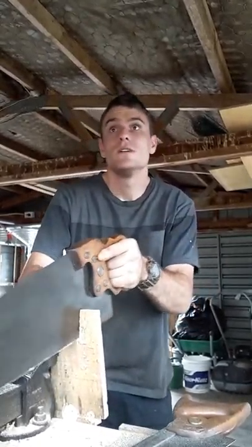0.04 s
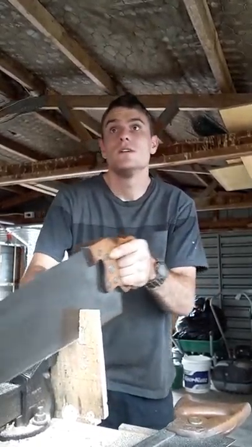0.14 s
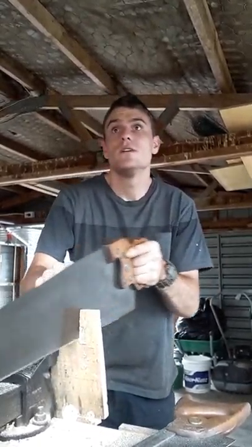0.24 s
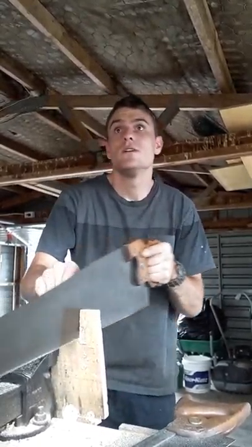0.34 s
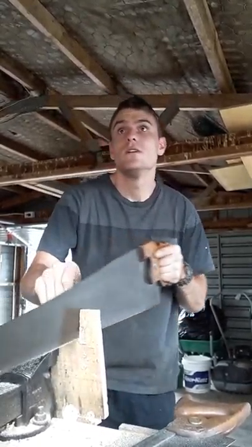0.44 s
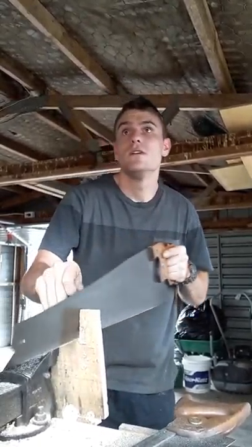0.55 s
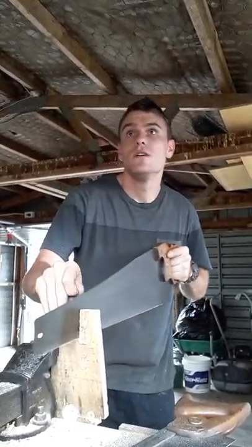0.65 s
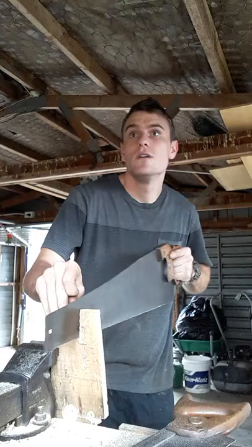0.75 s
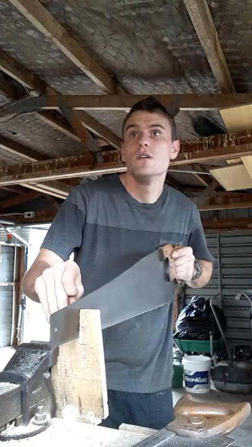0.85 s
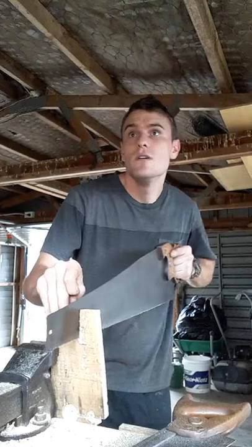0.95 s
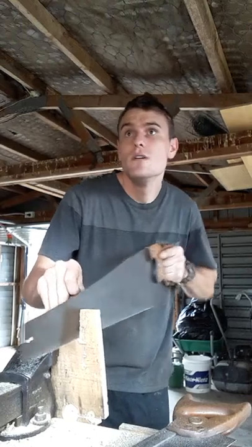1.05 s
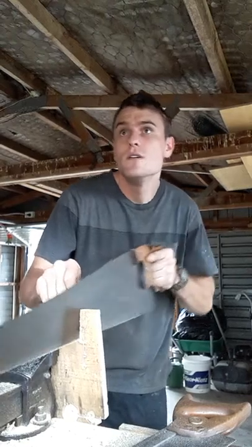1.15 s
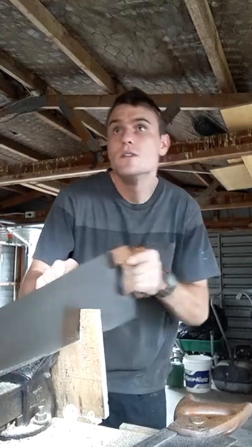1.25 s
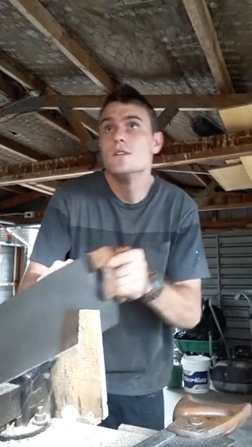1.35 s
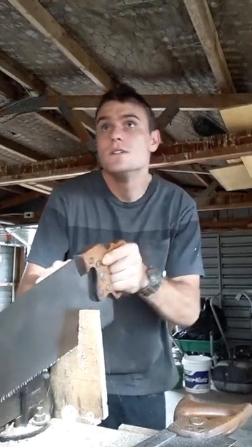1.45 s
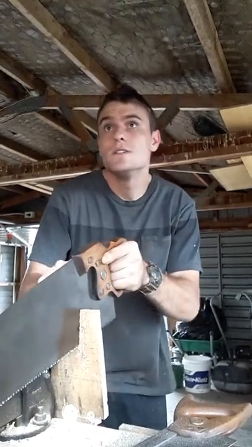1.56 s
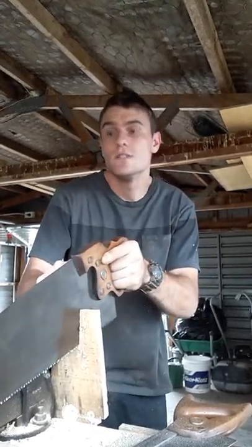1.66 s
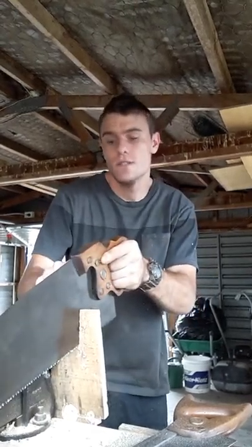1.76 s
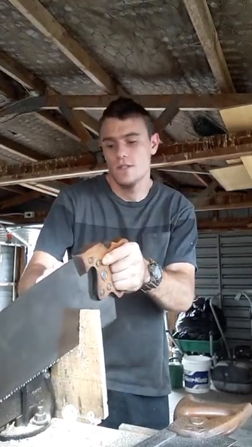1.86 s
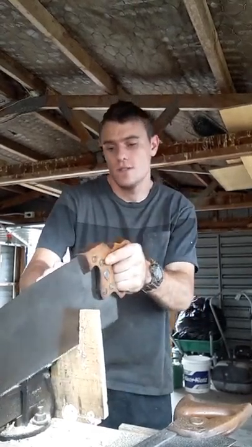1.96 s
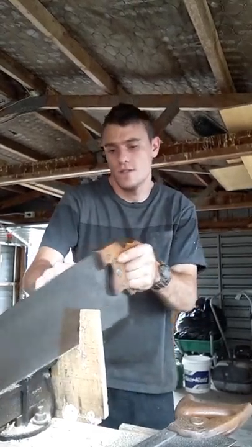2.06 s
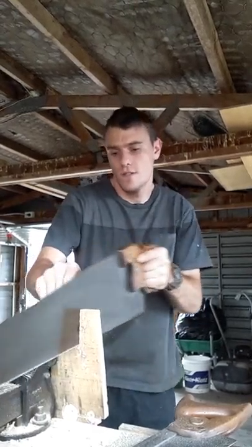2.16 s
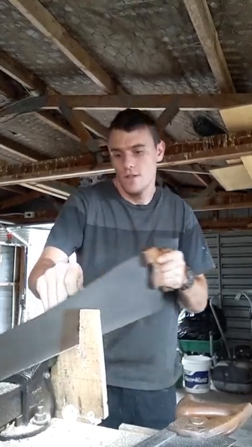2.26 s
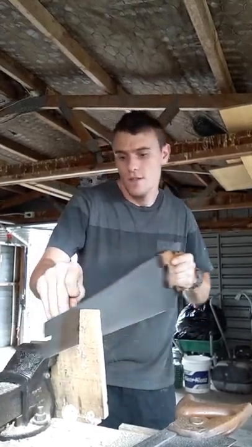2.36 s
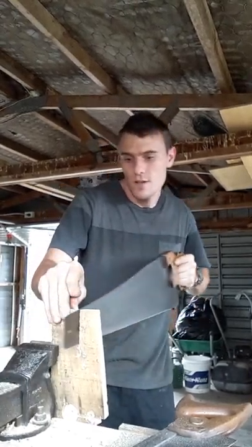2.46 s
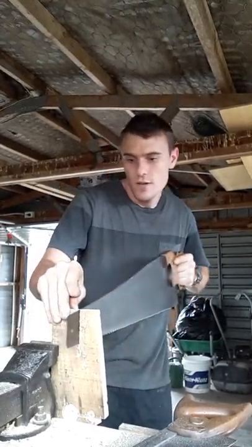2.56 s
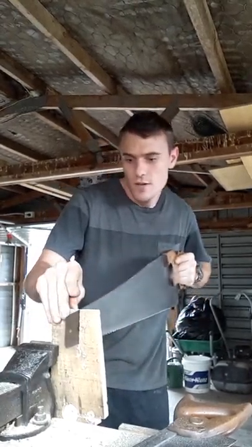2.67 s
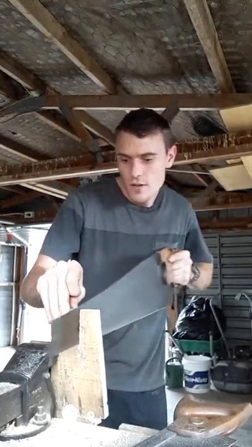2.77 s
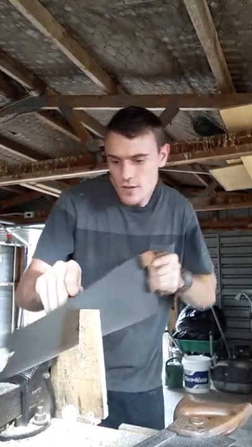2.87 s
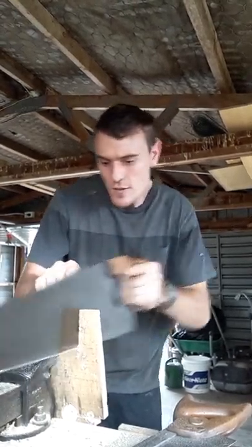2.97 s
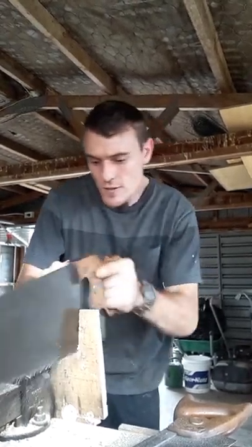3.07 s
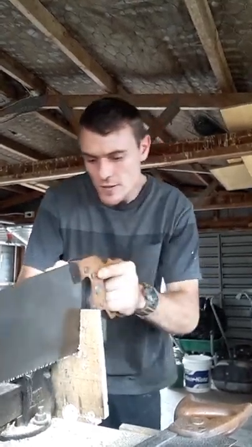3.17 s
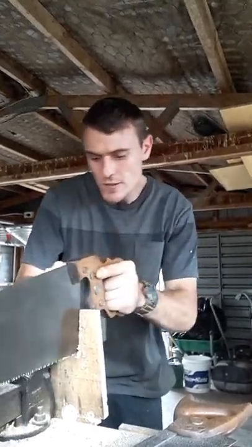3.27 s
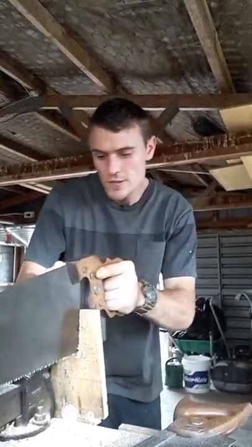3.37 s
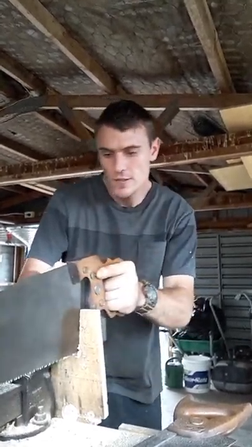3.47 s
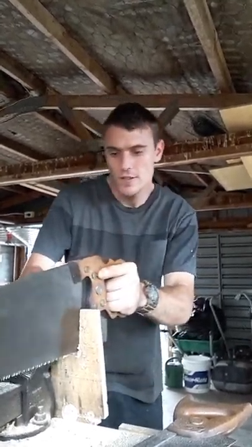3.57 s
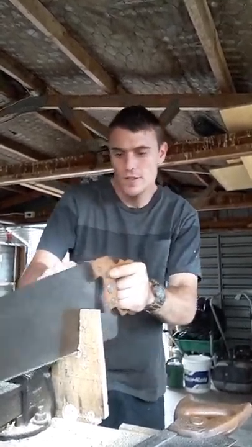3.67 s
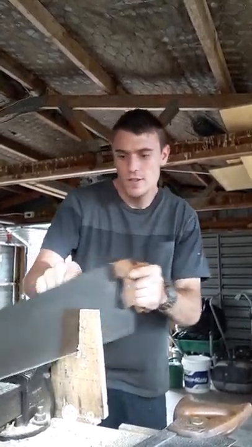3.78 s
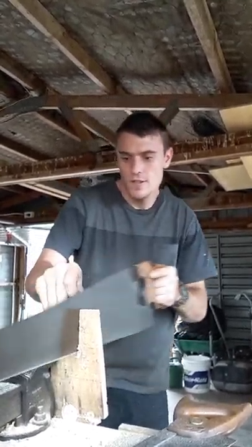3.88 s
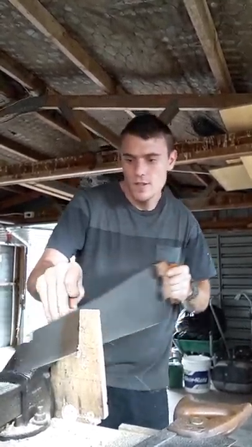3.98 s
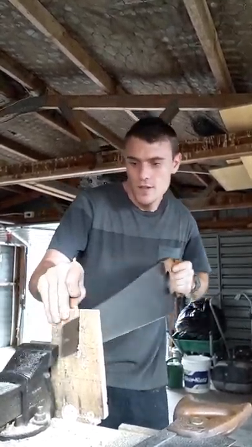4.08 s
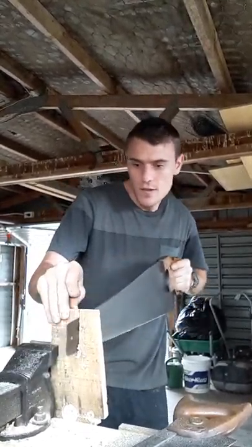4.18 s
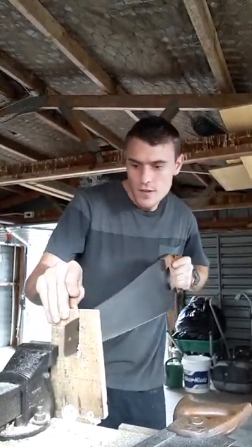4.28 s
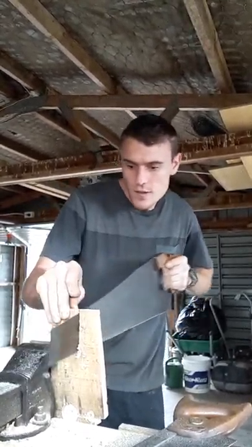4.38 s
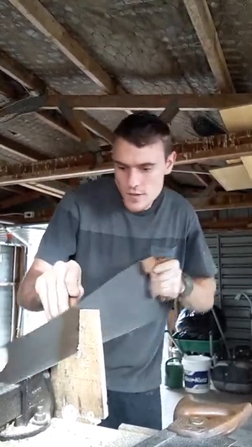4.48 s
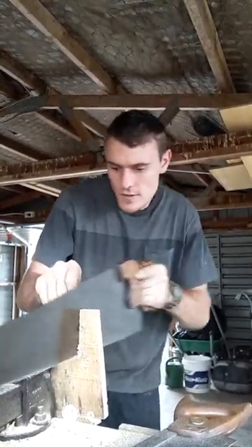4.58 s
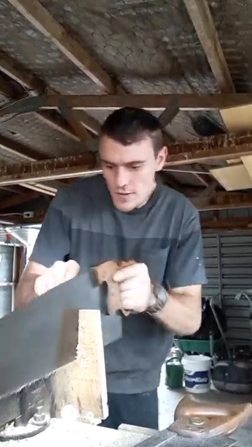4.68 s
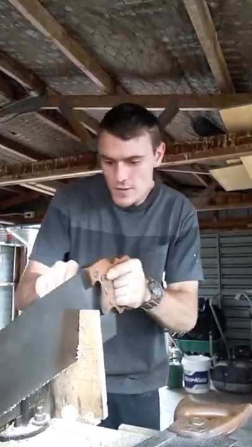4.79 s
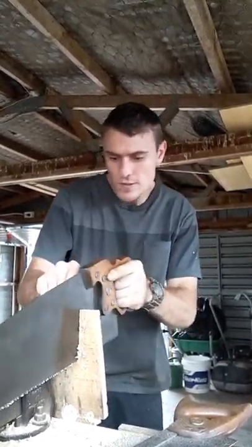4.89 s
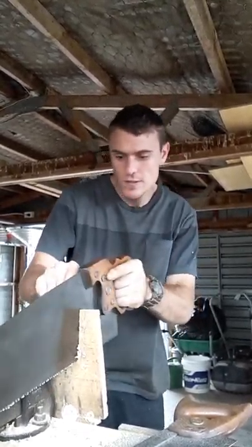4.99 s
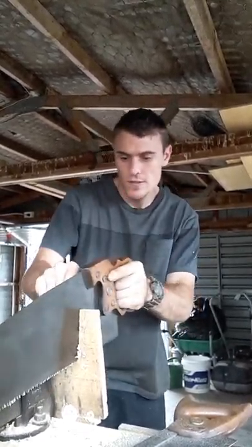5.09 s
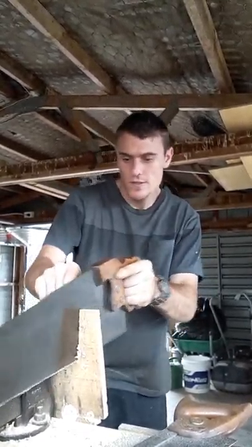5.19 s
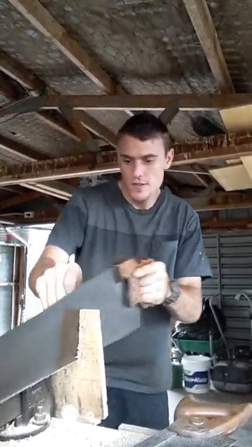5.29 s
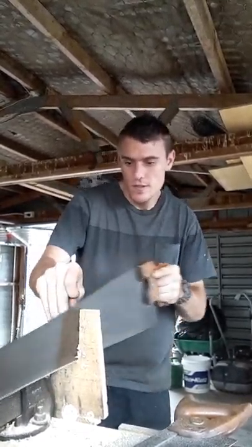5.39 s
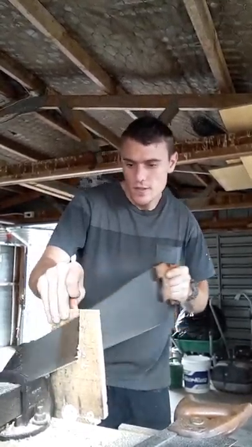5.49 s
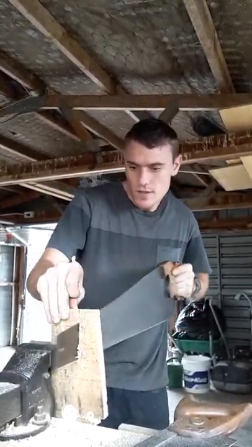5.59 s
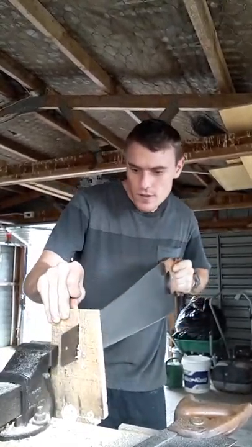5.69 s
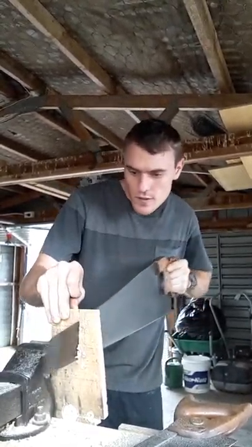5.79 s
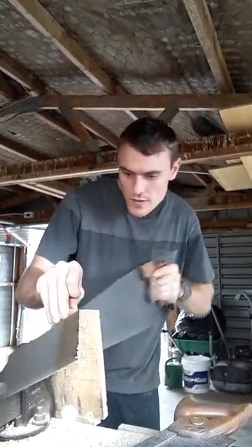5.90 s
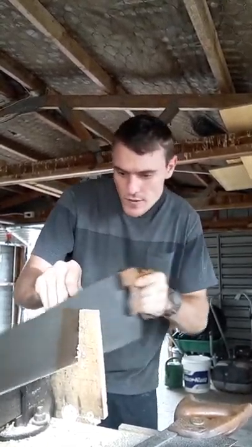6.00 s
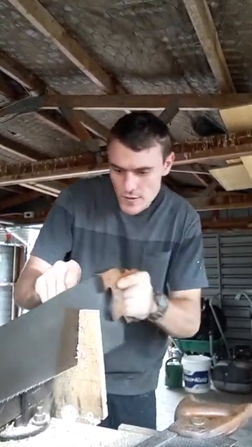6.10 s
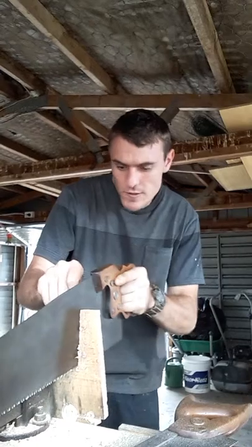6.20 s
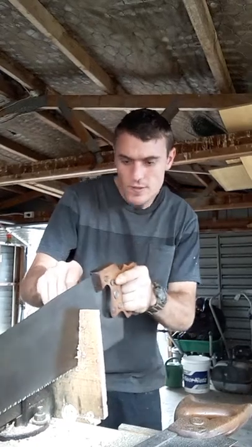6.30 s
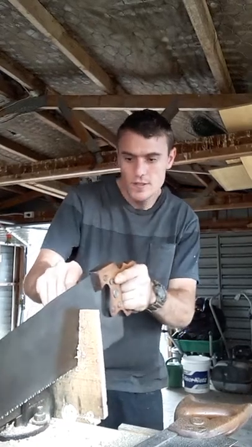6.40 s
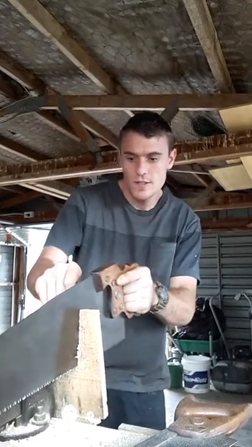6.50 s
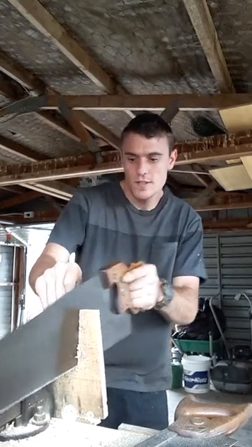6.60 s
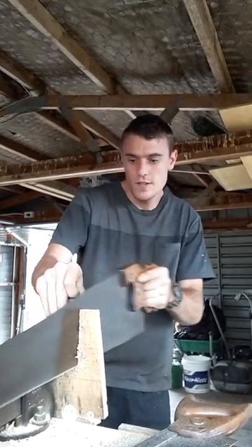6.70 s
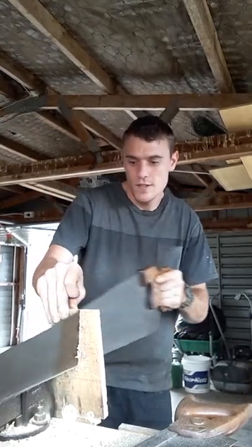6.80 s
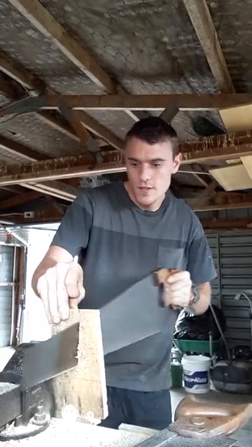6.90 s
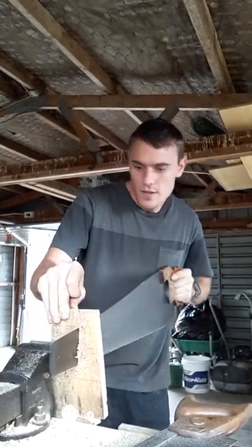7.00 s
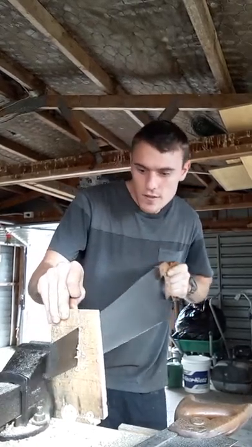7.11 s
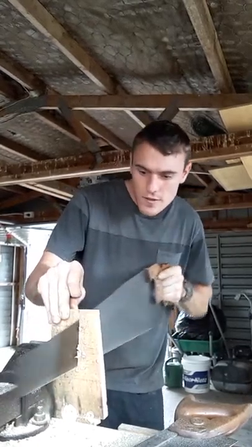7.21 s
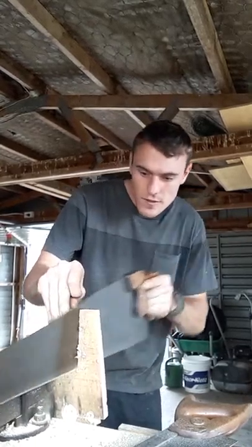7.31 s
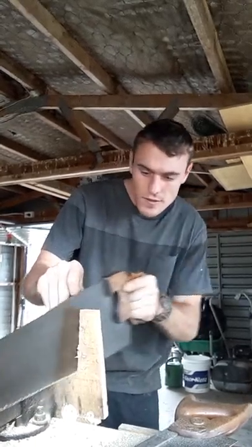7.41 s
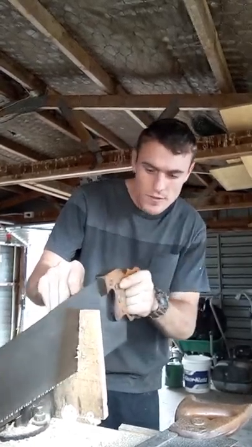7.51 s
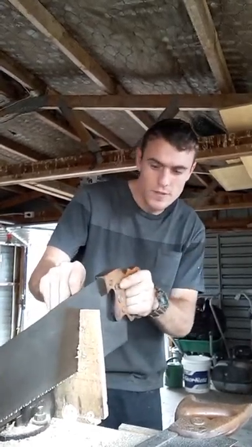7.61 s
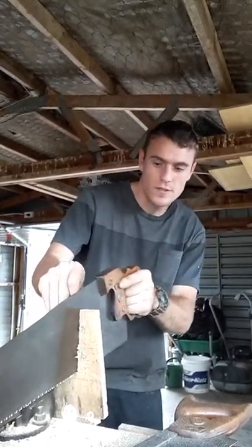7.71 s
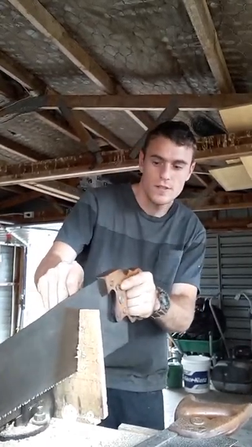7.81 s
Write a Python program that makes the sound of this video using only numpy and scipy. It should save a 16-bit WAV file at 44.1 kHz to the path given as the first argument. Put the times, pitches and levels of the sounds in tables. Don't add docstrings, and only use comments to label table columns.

```python
import sys
import numpy as np
from scipy import signal
from scipy.fft import rfft, irfft, next_fast_len
from scipy.io import wavfile
from scipy.ndimage import uniform_filter1d

SR = 44100
rng = np.random.default_rng(int(sys.argv[2]) if len(sys.argv) > 2 else 0)


def persist_wave(psi):
    counts = np.round(np.clip(psi, -1, 1) * 32767).astype(np.int16)
    wavfile.write(sys.argv[1], SR, np.atleast_2d(counts).T)


def decibels_to_gain(level_db):
    exponent = np.asarray(level_db, float) / 20
    return 10 ** exponent


N = 346185

# bench level in dB,
# feed in dB of the wood modes near 410, 780, 1000 and 1710 Hz.
BEARING = [(-19.5, -7, -4, 4, -21.5), (-18, -4.5, -0.5, 4.5, -21), (-18.5, 0.5, 0.5, 5, 1),
           (-22, -0.5, -0.5, 6, 2), (-20, -3.5, -1.5, 0, 2.5), (-21.5, 0.5, 0.5, -1.5, 2.5),
           (-24, 2, 1, -3, 6.5), (-23, -4.5, 1, -2, 2), (-24.5, 3.5, -1, -5, 4), (-23.5, -3.5, 0, 1.5, 3)]


def saw():
    which, _ = stroke_now()
    bench_peak_db, *grip_db = np.transpose(BEARING)
    grip_db = uniform_filter1d(np.array(grip_db)[:, which], size=2000)
    blade_db = blade_level()
    speed = np.clip(decibels_to_gain(0.44 * (blade_db + 21)), 0.08, 1.3)
    force = contact(speed, bite_db=-9, spread_db=2.0, tears_per_s=7000)
    steel = decibels_to_gain(blade_db - 0.28) * blade_rasp(speed, grip_db[2])
    return bench_rumble(force, bench_peak_db) + hums(force) + wood_rasp(force, speed, grip_db) + steel


# start, fastest and stop in seconds, blade and wood rasp in dB.
STROKES = [
    (0.03, 0.331, 0.9, -25, -20),
    (0.947, 1.171, 1.5, -19.5, -16),
    (1.96, 2.328, 2.57, -22, -18),
    (2.715, 2.943, 3.2, -16, -16.5),
    (3.62, 3.949, 4.22, -20, -18),
    (4.312, 4.521, 4.84, -16, -17.5),
    (5.141, 5.449, 5.71, -21, -22),
    (5.77, 5.95, 6.22, -16, -18),
    (6.57, 6.882, 7.09, -24, -23.5),
    (7.1, 7.319, 7.53, -17.5, -19),
]


def stroke_now():
    t = np.arange(N) / SR
    start, _, stop, *_ = np.transpose(STROKES)
    which = np.maximum(np.searchsorted(start, t) - 1, 0)
    return which, np.clip((t - start[which]) / (stop - start)[which], 0, 1)


def answer(peak_db, pull_law, push_law, lag_s=0):
    t = np.arange(N) / SR
    which, _ = stroke_now()
    start, fastest, stop, *_ = np.array(STROKES)[which].T
    speeding = (t - start - lag_s) / (fastest - start - lag_s)
    slowing = (stop - t) / (stop - fastest)
    arc = np.where(t < fastest, speeding, slowing)
    speed_db = 20 * np.log10(np.sin(np.pi / 2 * np.clip(arc, 0, 1)) + 1e-4)
    power = 0
    for pushing, (rising, falling, fast, linger_db, slow) in enumerate([pull_law, push_law]):
        driven_db = np.asarray(peak_db)[which] + np.where(t < fastest, rising, falling) * speed_db
        driven_db = np.where(which % 2 == pushing, driven_db, -200)
        quick_db, late_db = (np.maximum.accumulate(driven_db + rate * t) - rate * t for rate in (fast, slow))
        power = power + decibels_to_gain(quick_db) ** 2 + decibels_to_gain(late_db + linger_db) ** 2
    return 10 * np.log10(power)


def peaks(rows, rise_db_s, fall_db_s):
    t = np.arange(N) / SR
    swells = []
    for s, held, db in rows:
        swells.append(db - rise_db_s * np.maximum(s - t, 0) - fall_db_s * np.maximum(t - s - held, 0))
    return np.max(swells, axis=0)


def contact(speed, bite_db, spread_db, tears_per_s):
    teeth_per_s = 190
    turn = np.cumsum(teeth_per_s * speed * (1 + 0.3 * drift(60))) / SR
    passes = np.diff(np.floor(turn), prepend=0) > 0
    bites = passes * decibels_to_gain(2.8 * rng.standard_normal(N)) * np.sqrt(speed * SR / teeth_per_s)
    load = np.minimum(speed, 1)
    sizes = decibels_to_gain(spread_db * load * np.minimum(rng.exponential(1, N), 5)) * rng.standard_normal(N)
    tears = (rng.random(N) < tears_per_s / SR / load) * sizes * np.exp(-0.7 * load * (turn % 1))
    force = (rms_one(tears) + decibels_to_gain(bite_db) * bites) * decibels_to_gain(1.84 * drift(30))
    return force / np.sqrt(uniform_filter1d(force ** 2, size=4400) + 1e-9)


# start and hold in seconds, rasp in dB.
CREEPS = [(0, 0.021, -66), (.88, .07, -50), (1.53, .1, -51), (1.7, .25, -65), (2.62, 0.077, -56),
          (3.3, 0.29, -56), (4.24, 0.064, -51), (4.9, .24, -56), (5.72, 0.029, -47), (6.4, .16, -63.5),
          (7.72, 0.091, -65)]
# power of rising and of falling speed, fast release in dB/s, lingering share in dB,
# slow release in dB/s.
BLADE_LAW = (1.22, 1.1, 300, -30, 45)


def blade_level():
    stroke_db = answer(np.transpose(STROKES)[3], BLADE_LAW, BLADE_LAW)
    return np.maximum(stroke_db, peaks(CREEPS, rise_db_s=200, fall_db_s=150))


# frequency in Hz, width in Hz, level in dB.
BLADE = [(3780, 68, -6), (4059, 73, 15), (4790, 41, -0.5), (5620, 490, 5), (7080, 37, -15), (8650, 660, 1)]
# frequency in Hz, density in dB per Hz.
BLADE_BODY = [(1650, -26), (2800, -10.5), (3530, -16.5), (3820, -11.5), (3930, -10), (4160, -8.5),
              (4600, -15.5), (6140, -18.5), (7090, -13), (8360, -0.5), (11100, -19.5), (12300, -21),
              (14000, -24), (15600, -25.5)]


def blade_rasp(speed, grip_db):
    rasp = plate(contact(speed, bite_db=-24, spread_db=1.6, tears_per_s=14000), t60_s=0.05)
    steel = modes(rasp, BLADE, np.outer([0.4, 0.63, 0.4, 0.48, 0.4, 0.24], grip_db))
    blade = rms_one(decibels_to_gain(-8.0) * rms_one(steel) + coloured(rasp, BLADE_BODY))
    edge = np.clip(5.8 * speed - 0.4, 0, 1) ** 0.63
    return dulled(blade, 10200, edge ** 2)


def plate(x, t60_s):
    t = np.arange(3000) / SR
    shimmer = rng.standard_normal(3000) * 1000 ** (-t / t60_s)
    return x + decibels_to_gain(-10.5) * signal.fftconvolve(x, shimmer / np.sqrt(np.sum(shimmer ** 2)))[:N]


# frequency in Hz, width in Hz, level in dB.
WOOD = [(338, 45, -2.5), (550.2, 8.5, 5.5), (1160, 37, -21), (1346, 73, -17), (2147, 88, -2.5),
        (2380, 18, -12), (2820, 48, -17)]
WOOD_GRIPPED = [(398.8, 8.5, 5), (812.3, 20.4, 0.5), (977, 153, -13.5), (1731.5, 38, -4.5)]
# frequency in Hz, density in dB per Hz.
WOOD_BODY = [(180, -19.5), (300, 1.5), (329, -6), (545, -15.5), (616, -11.5), (2160, -15), (3500, -26),
             (4550, -73.5), (7700, -120)]
WOOD_LAW = (1.1, 0.83, 221, -20.5, 48.5)
PUSH_WOOD_LAW = (0.89, 0.45, 152, -15.5, 58)


def wood_rasp(force, speed, grip_db):
    level_db = answer(np.transpose(STROKES)[4], WOOD_LAW, PUSH_WOOD_LAW)
    rings = modes(force, WOOD, [0] * 7) + modes(force, WOOD_GRIPPED, 1.35 * grip_db)
    wood = rms_one(rms_one(below(rings, 4280)) + decibels_to_gain(1.0) * coloured(force, WOOD_BODY))
    wood = dulled(wood, 920, np.clip(1.15 * speed, 0.6, 1))
    return decibels_to_gain(level_db + 2.5) * wood


# time in seconds, pitch in Hz, level in dB.
GROANS = [
    [(0.28, 446, -26.5), (0.312, 419, -39), (0.336, 399, -23), (0.406, 415, -16.5), (0.516, 416, -23),
     (0.588, 407, -18), (0.66, 380, -31)],
    [(6.7, 417, -33), (6.78, 407, -19), (6.838, 415, -10.5), (6.914, 415, -14), (6.946, 409, -33),
     (7.008, 406, -32), (7.04, 420, -22)],
]


def hums(force):
    groans = []
    for rows in GROANS:
        before = (rows[0][0] - 0.04, rows[0][1], -90)
        after = (rows[-1][0] + 0.04, rows[-1][1], -90)
        groans += [before, *rows, after]
    main = decibels_to_gain(-2.0) * board_hum(force, hum_course(), width_hz=13.8)
    return main + decibels_to_gain(-5.0) * board_hum(force, in_time(groans), width_hz=16)


def board_hum(force, course, width_hz):
    hz, level_db = course
    hz = uniform_filter1d(hz, size=5000)
    spin = np.exp(2j * np.pi * np.cumsum(hz) / SR)
    r = np.exp(-np.pi * width_hz / SR)
    swing = signal.lfilter([1], [1, -2 * r, r * r], force / spin)
    even = swing / np.abs(swing) ** 0.68
    return decibels_to_gain(level_db) * rms_one(np.real(even * spin))


# start and hold in seconds, level in dB.
LOCKS = [(.13, 0.012, -22), (.27, 0.024, -7.5), (.46, 0.015, -17), (.62, 0.061, -27), (.87, 0.027, -21.5),
         (1.24, 0.04, -5.5), (1.35, 0.053, -12), (2.13, 0.015, -9.5), (2.24, 0.029, -9), (2.46, .04, -13.5),
         (2.775, 0.048, -8), (3.05, .02, -22), (3.15, .03, -16.5), (3.75, 0.067, -14.5), (3.92, 0.093, -9),
         (4.09, 0.034, -10), (4.39, .04, -8), (4.51, 0.061, -13), (4.635, .04, -8.5), (4.72, 0.024, -11),
         (5.29, .02, -15.5), (5.38, 0.1203, -14), (5.65, 0.025, -19), (5.8, .15, -9.5), (6.03, .03, -8.5),
         (6.14, 0.01, -10.5), (6.66, 0.029, -14.5), (6.77, 0.063, -13.5), (6.96, 0.09, -11.5),
         (7.17, .21, -9)]
HUM_LAW = (0.6, .45, 408, -23, 53)


def hum_course():
    kerf_sag_hz = 1.373 * np.arange(N) / SR
    stroke_sag_hz = 12.2 * stroke_now()[1]
    hz = 276.5 - kerf_sag_hz - stroke_sag_hz + 3.06 * drift(2.7)
    free_db = answer([-19] * len(STROKES), HUM_LAW, HUM_LAW, lag_s=0.022)
    return hz, np.maximum(free_db, peaks(LOCKS, rise_db_s=401.5, fall_db_s=352.5))


# frequency in Hz, width in Hz, level in dB.
BENCH = [(122.7, 30, -1.5), (165.3, 17, 5.5), (168.3, 46, -2), (215, 7.6, -31)]
BENCH_DEEP = [(60.2, 15.2, 0.014), (73.2, 17.5, 0.025)]
# time in seconds, level in dB.
JOLTS = [
    (1.1, -10),
    (1.43, -17.5),
    (3.13, -12),
    (4.681, -9.5),
    (6.129, -15.5),
    (7.45, -17.5),
]
BENCH_LAW = (0.3, 0.67, 165, -4, 56)
PUSH_BENCH_LAW = (0.15, 0.3, 160, -11.5, 56)


def bench_rumble(force, peak_db):
    jolt_db = peaks([(s, 0, db) for s, db in JOLTS], rise_db_s=117, fall_db_s=103)
    level_db = np.maximum(answer(peak_db, BENCH_LAW, PUSH_BENCH_LAW, lag_s=0.03), jolt_db)
    which, _ = stroke_now()
    deep_db = np.where(which % 2, -5, 4.5)
    shake = modes(force, BENCH, [-0.6 * deep_db] * 4) + modes(force, BENCH_DEEP, [0.27 * deep_db] * 2)
    shake = below(shake, 247)
    shake = shake / uniform_filter1d(shake ** 2, size=6000) ** 0.3
    return decibels_to_gain(level_db - 1.0) * rms_one(shake)


# time in seconds, peak in dB, crack in dB against the peak.
TICKS = [(0.124, -17.5, -12), (0.97, -44, -17), (1.609, -29.5, -18), (1.629, -25.5, -26), (1.761, -26, -32),
         (1.918, -23, -18), (1.99, -45.5, -18), (2.049, -16, -12), (2.11, -24, -2.5), (2.73, -24.5, -23),
         (3.294, -22.5, -27), (3.476, -26.5, -25), (3.57, -27.5, -34), (4.308, -40.5, -3),
         (4.886, -28.5, -18), (4.985, -31.5, -21), (5.039, -23, -22), (5.095, -26.5, -31),
         (5.146, -23, -15), (5.81, -24, -23), (6.21, -21.5, -11), (6.302, -29.5, -21.5), (6.35, -37.5, -15),
         (6.45, -23, -14), (6.634, -19, -11.5), (7.669, -28.5, -18.5), (7.754, -23.5, -18)]
# frequency in Hz, level in dB, T60 in seconds.
TICK_MODES = [(428, -4, 0.11), (571, -2.5, 0.18), (681, 0.5, 0.035), (966, 3, 0.029), (1194, 4.5, 0.021),
              (1376, -14.5, 0.1), (1583, -15, 0.06), (1920, -9.5, .03), (2280, -13, 0.018),
              (2920, -23, 0.091)]
# frequency in Hz, density in dB per Hz.
TICK_CRACK = [(600, -20.5), (1500, 0), (3000, 0.5), (5500, -3.5), (7000, -10), (8300, 0.5), (10000, -23.5),
              (15000, -45)]


def ticks():
    out = np.zeros(N + 4000)
    t = np.arange(4000) / SR
    check = 1 - 0.7 / (1 + np.exp((0.017 - t) / 0.0015))
    for s, peak_db, crack_db in TICKS:
        ring = 0
        for k, (hz, db, t60_s) in enumerate(TICK_MODES):
            level = decibels_to_gain(db + 2.2 * rng.standard_normal()) * (-1) ** k
            swell = 1 - np.exp(-t * hz / 4.2)
            ring = ring + level * np.sin(2 * np.pi * hz * t) * swell * 1000 ** (-t / t60_s)
        burst = rng.standard_normal(4000) * (np.exp(-t / 0.0008) + 0.15 * np.exp(-t / 0.008))
        crack = coloured(burst, TICK_CRACK)[:4000]
        ring = check * ring / np.abs(ring).max()
        crack = decibels_to_gain(crack_db + 16.0) * crack / np.abs(crack).max()
        at = round((s - 0.001) * SR)
        out[at:at + 4000] += decibels_to_gain(peak_db + 2.5) * (ring + crack)
    return out[:N]


# time in seconds, peak in dB.
SCUFFS = [(1.5848, -36), (3.1244, -22.5), (3.1642, -28), (3.1794, -30), (3.2206, -22), (3.2815, -31),
          (4.773, -8), (4.8097, -22), (5.7892, -13), (6.191, -15), (7.118, -20), (7.5635, -27),
          (7.5946, -31.5), (7.634, -31.5)]


def scuffs():
    t = np.arange(2000) / SR
    level = np.zeros(N + 2000)
    for s, peak_db in SCUFFS:
        at = round(s * SR)
        level[at:at + 2000] += decibels_to_gain(peak_db - 9.5) * (1 - np.exp(-t / 0.00072)) * np.exp(-t / 0.028)
    return level[:N] * dulled(coloured(rng.standard_normal(N), BLADE_BODY), 10000, 0.25)


def workshop(x):
    t60_s, wall_cut_hz = 0.65, 1600
    size = next_fast_len(N + SR)
    turn = np.exp(-2j * np.pi * np.arange(size // 2 + 1) / size)
    dull = np.exp(-2 * np.pi * wall_cut_hz / SR)
    echo = 0
    for k, lag in enumerate((rng.uniform(0.017, 0.05, 8) * SR).astype(int)):
        loop = decibels_to_gain(-60 * lag / SR / t60_s) * (1 - dull) / (1 - dull * turn) * turn ** lag
        echo = echo + (-1) ** k * loop / (1 - loop)
    return irfft(rfft(x, size) * echo, size)[:N]


# frequency in Hz, density in dB per Hz.
AIR = [(18, -42), (30, -13), (202, 24), (536, 3.5), (3510, -4.5), (4190, -20), (5380, -62), (8240, -86),
       (12000, -90), (15600, -88.5), (22000, -120)]


def room_air():
    return decibels_to_gain(-49.5) * coloured(rng.standard_normal(N), AIR)


def rms_one(x):
    return x / np.sqrt(np.mean(x ** 2) + 1e-20)


def in_time(rows):
    s, *columns = np.transpose(rows)
    return [np.interp(np.arange(N) / SR, s, c) for c in columns]


def drift(rate_hz):
    r = np.exp(-80 * np.pi * rate_hz / SR)
    slow = signal.lfilter([1], [1, -2 * r, r * r], rng.standard_normal(N // 40 + 2002))[2000:]
    return np.interp(np.arange(N) / 40, np.arange(len(slow)), rms_one(slow))


def resonate(x, hz, width_hz):
    r = np.exp(-np.pi * width_hz / SR)
    poles = [1, -2 * r * np.cos(2 * np.pi * hz / SR), r * r]
    return signal.lfilter([(1 - r * r) / 2, 0, (r * r - 1) / 2], poles, x)


def modes(x, table, feed_db):
    out = 0
    for k, (extra_db, (hz, width_hz, db)) in enumerate(zip(feed_db, table)):
        fed = x * decibels_to_gain(extra_db + 1.3 * drift(11.3))
        out = out + decibels_to_gain(db) * resonate(fed, hz, width_hz) * (-1) ** k
    return out


def coloured(x, spectrum):
    hz, level_db = np.transpose(spectrum)
    grid_hz = np.maximum(np.arange(1025) * SR / 2048, 1)
    cepstrum = irfft(np.log(decibels_to_gain(np.interp(np.log(grid_hz), np.log(hz), level_db))))
    cepstrum[1:1024] *= 2
    cepstrum[1025:] = 0
    return rms_one(signal.fftconvolve(x, irfft(np.exp(rfft(cepstrum))))[:N])


def dulled(x, hz, share):
    low = signal.sosfiltfilt(signal.butter(3, hz, fs=SR, output="sos"), x)
    return share * x + (1 - share) * low


def below(x, hz):
    return signal.sosfilt(signal.butter(4, hz, fs=SR, output="sos"), x)


def scene():
    dry = saw() + ticks() + scuffs()
    return (dry + decibels_to_gain(-19.0) * workshop(dry) + room_air())[None]


def low_pass(x):
    return signal.sosfilt(signal.butter(12, 15800, fs=SR, output="sos"), x)


def record(dry):
    thin = signal.sosfilt(signal.butter(4, 44, "high", fs=SR, output="sos"), dry)
    rounded = thin / (1 + np.abs(thin / 0.97) ** 5) ** (1 / 5)
    return low_pass(rounded)


dry = scene()
out = record(dry)
persist_wave(out)
```